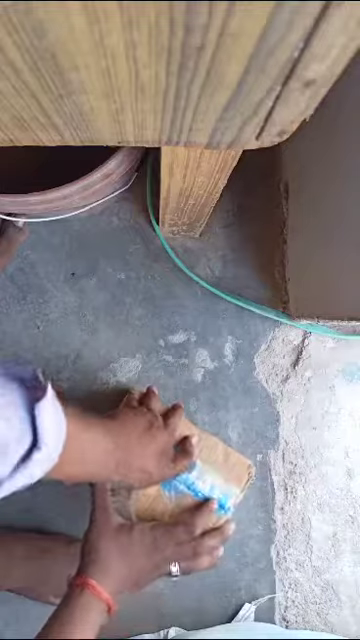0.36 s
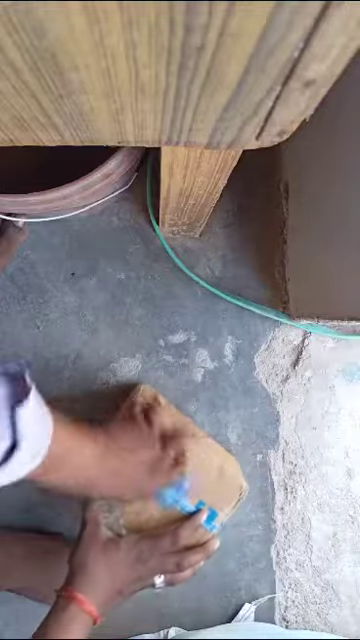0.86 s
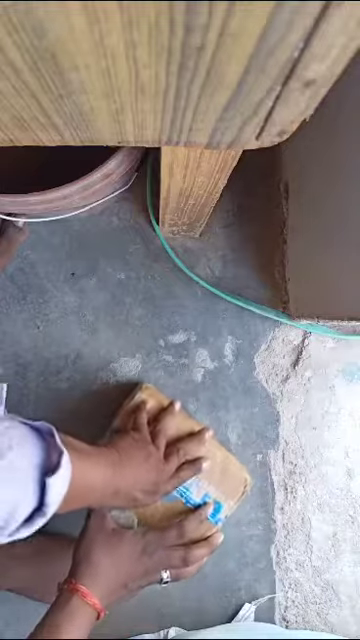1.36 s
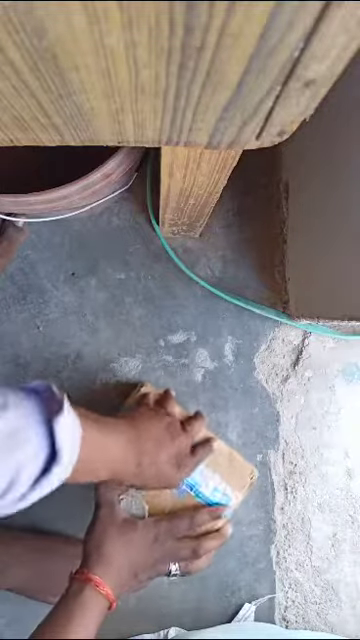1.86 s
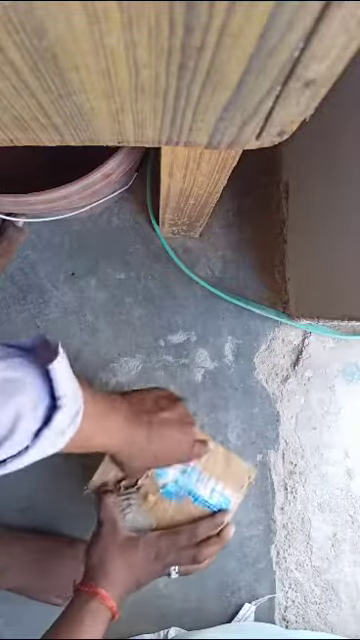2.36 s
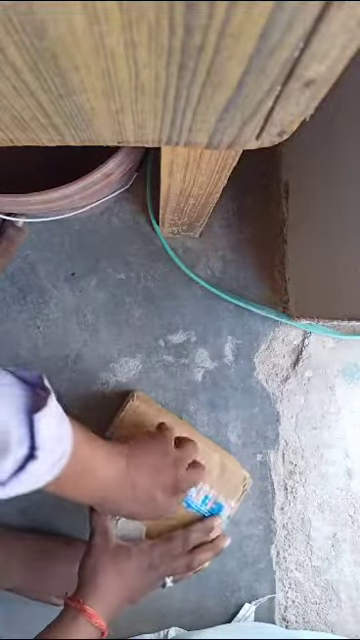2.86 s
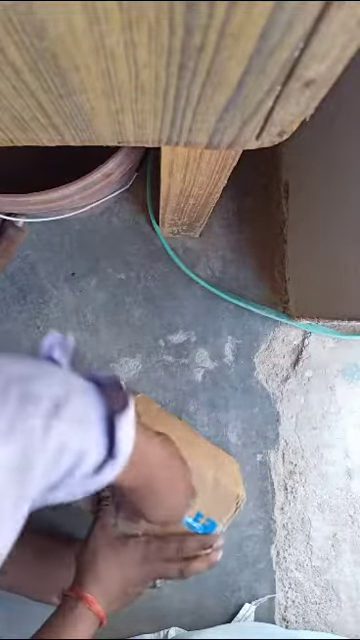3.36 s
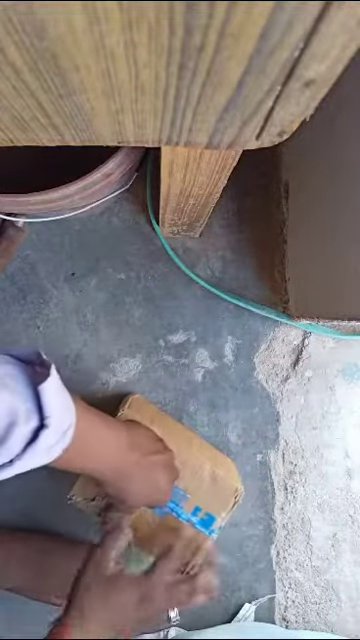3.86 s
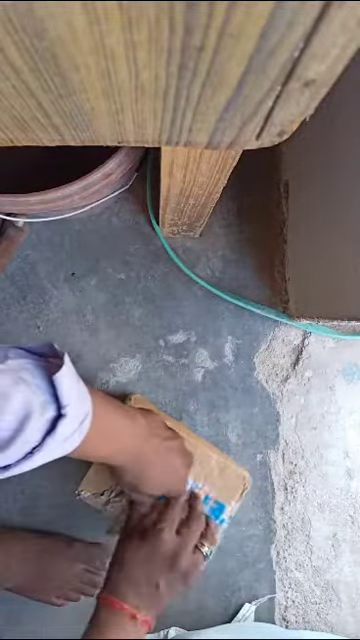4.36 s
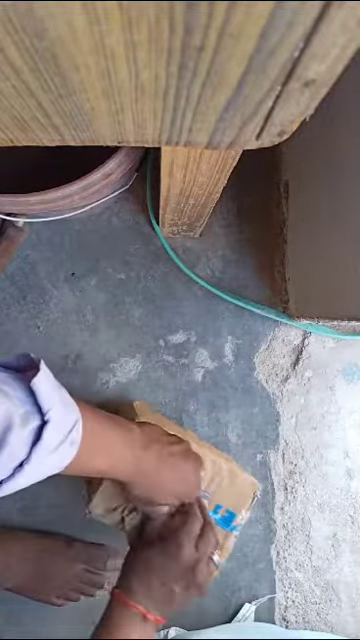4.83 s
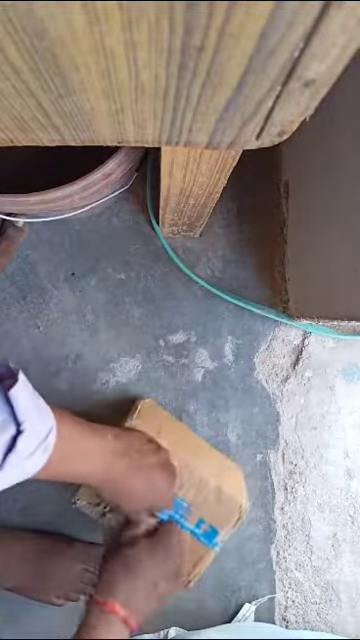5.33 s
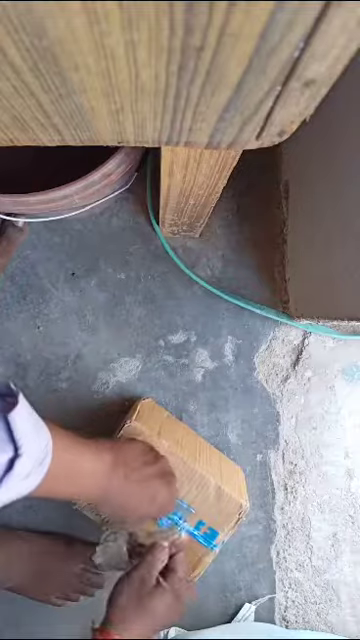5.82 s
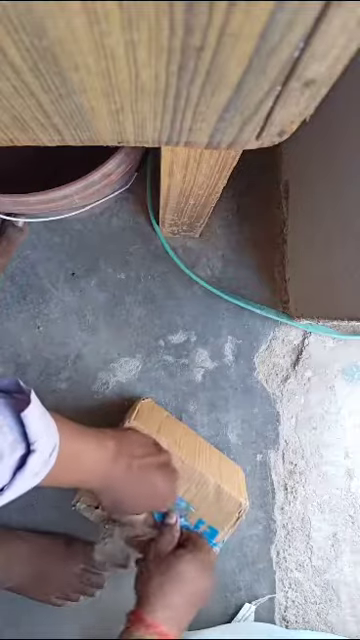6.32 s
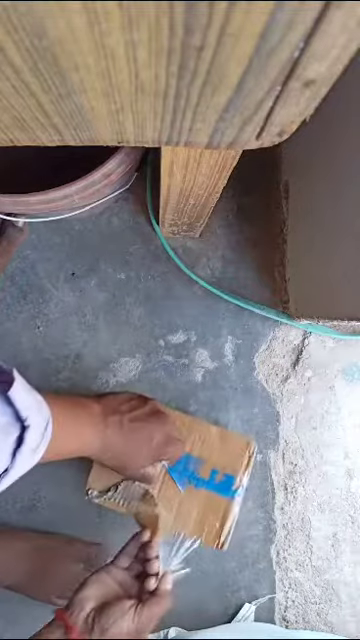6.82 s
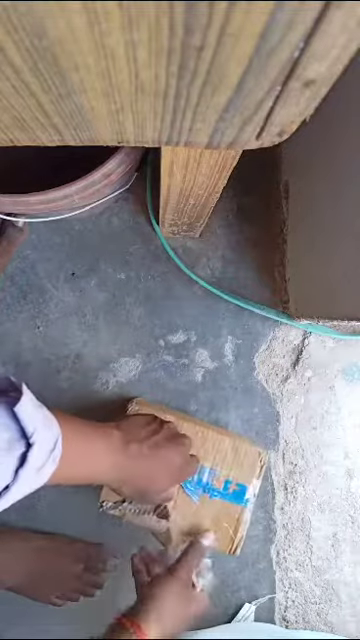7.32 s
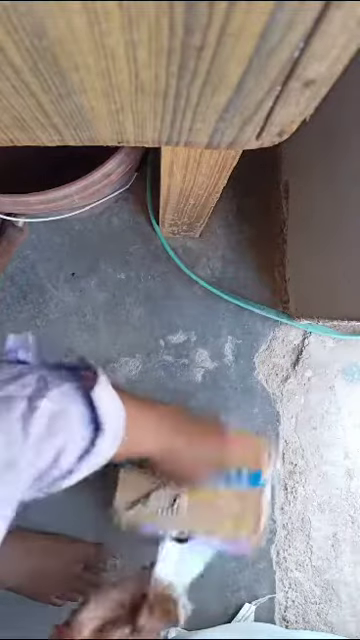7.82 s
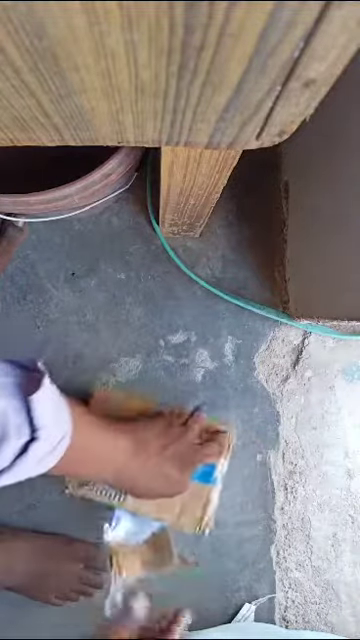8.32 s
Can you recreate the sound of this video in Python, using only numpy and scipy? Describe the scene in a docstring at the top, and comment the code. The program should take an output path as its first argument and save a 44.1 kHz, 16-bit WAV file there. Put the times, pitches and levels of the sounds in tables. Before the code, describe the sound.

Packing tape snaps and rips off a small hollow carton on concrete, in uneven bursts with quiet rustling between, over a growing distant engine throb.

```python
"""Hands tear open a taped cardboard parcel on a concrete floor beside walls.
Tape and fibres let go in snaps (noise bursts) and dense crackle (crowds of tiny fizzes);
the hollow box and its flaps boom and rasp along (ringing tones), and the walls echo.
An engine idles somewhere off and draws nearer (waves locked to its firing).
A faint hiss and rumble (filtered noise) lie under it all."""
import sys
import numpy as np
from scipy import signal
from scipy.fft import rfft, irfft
from scipy.io import wavfile

SR = 44100
rng = np.random.default_rng(int(sys.argv[2]) if len(sys.argv) > 2 else 0)


def transcribe(signal):
    """Save signal, clipped to [-1, 1], as a 16-bit WAV file at the path in sys.argv[1]."""
    frames = np.atleast_2d(signal).T
    limited = np.clip(frames, -1, 1)
    pcm = np.round(limited * 32767).astype(np.int16)
    wavfile.write(sys.argv[1], SR, pcm)


def amplitude_ratio(level_db):
    """Convert a level in decibels to the matching linear amplitude (field) ratio."""
    exponent = np.asarray(level_db, float) / 20
    return 10 ** exponent


N = 372204   # samples, about 8.44 s

# colour of the background noise: (frequency [Hz], relative level per Hz [dB])
AIR_COLOUR = [(26, -67), (45, 5.5), (170, 14), (338, 1), (432, -34), (624, 12), (741, -7), (1150, -7),
              (2410, -17), (8040, -12), (10500, -43), (14900, -34), (16700, -38)]
# loudness of the background noise: (time [s], level [dB])
AIR_LEVEL = [(0, -50), (1.2, -55), (2.4, -56.5), (3.4, -56.5), (4.0, -61), (4.6, -57.5), (6, -55.5),
             (7, -51.5), (8.44, -44)]
# pace of the engine: (time [s], firing rate [firings per s])
ENGINE_FIRING = [(0, 27.5), (3, 26.9), (3.8, 26.3), (4.5, 27), (5.9, 27.2), (6.9, 27.3), (7.7, 27.45),
                 (8.1, 27.25), (8.44, 26.8)]
# the engine nearing: (time [s], level of the seventh multiple [dB], swell of the two below it [dB])
ENGINE_NEARNESS = [(0, -63, -16), (2.5, -66, 5), (3.2, -58, -11), (3.9, -61, 3.5), (4.3, -67.5, 1),
                   (5.5, -54.5, 4), (6.3, -55.5, -17), (6.9, -50, -2), (7.3, -43, 6), (7.6, -47, -9),
                   (7.95, -39.5, -13), (8.1, -37.5, 0), (8.3, -40, 8), (8.44, -42.5, 11.5)]
# tones of the engine: (multiple of the firing rate, level against the seventh [dB], share of the swell)
ENGINE_ORDERS = [(2, -24, 0), (3, -19, 0), (4, -18, 0), (5, -6, .4), (6, -6, 1), (7, 0, 0), (8, -12, 0),
                 (11, -13, 0), (14, -17, 0)]
# the box slides on the concrete: (start [s], length [s], level at its height [dB])
FLOOR_SLIDES = [(1.97, 0.18, -47), (2.152, .14, -53.5), (2.524, 0.32, -63), (3.03, 0.085, -61),
                (7.47, 0.36, -49.5), (8.22, 0.24, -53)]
# single releases and bumps:
# (time [s], crack peak [dB], box knock [dB], wall and flap knock [dB], crack colour [Hz])
SNAPS = [(0.052, -44, -22.5, -31.5, 7360), (0.2727, -43, -33, -42.5, 8100), (0.4388, -29, -33, -29, 9200),
         (0.4503, -19, -53, -25.5, 9700), (0.4739, -21, -45, -23.5, 8780), (0.5165, -16.5, -32, -24, 8100),
         (0.5336, -23.5, -48, -26, 5400), (0.6128, -35, -34, -38, 9400), (0.6351, -34, -24, -36, 5070),
         (0.6868, -24, -48, -37, 9600), (0.7135, -37, -22.5, -43, 7400), (0.7456, -28.5, -42, -52, 8900),
         (0.876, -57, -27.5, -35.5, 4600), (0.902, -32, -35, -49, 7200), (0.9491, -30, -30, -45, 6890),
         (1.272, -52, -31, -40, 7800), (1.321, -45, -42, -61, 7500), (1.3716, -51, -31, -43, 7470),
         (1.393, -54, -32, -45, 7500), (1.4302, -29, -19.5, -27, 8660), (1.465, -36, -42, -49, 6870),
         (1.5162, -46, -35, -41, 7800), (1.5298, -31, -41, -41, 7200), (1.661, -26, -62, -44, 7840),
         (1.915, -7.5, -29, -17.5, 7350), (2.06, -61, -39, -36, 8560), (2.09, -33, -34, -33.5, 4210),
         (2.155, -56, -35, -33, 7910), (2.2644, -40, -48, -38, 7910), (2.6434, -43, -26, -33, 8230),
         (2.935, -45, -39.5, -53, 8190), (3.0228, -33, -60, -61, 6440), (3.0796, -32, -27.5, -32.5, 6740),
         (3.122, -35, -46, -61, 6650), (3.256, -36.5, -40, -45.5, 6760), (3.311, -42, -35.5, -51, 6850),
         (3.427, -37, -49, -43, 4800), (3.523, -40, -57, -51, 7900), (3.6132, -45, -62, -68, 6740),
         (3.7555, -43, -42, -57, 8680), (4.346, -44.5, -45, -46, 5870), (4.532, -32.5, -29, -31, 4950),
         (4.5581, -33, -33, -35, 8600), (4.581, -15, -19.5, -17.5, 4270), (4.7076, -25, -42, -36, 7300),
         (4.7438, -24.5, -33, -35, 7060), (4.7557, -25, -40, -37, 3860), (4.7727, -12.5, -55, -16.5, 7450),
         (4.7825, -40, -28, -29, 8500), (4.952, -42, -38, -43.5, 8230), (5.1103, -22, -33, -33, 8000),
         (5.29, -49, -33, -50, 7010), (5.3267, -29.5, -34, -38, 6450), (5.431, -20, -19.5, -43, 7070),
         (5.444, -1.5, -13.5, -12, 7800), (5.5597, -20.5, -50, -33, 8900), (5.632, -23.5, -30, -29.5, 9600),
         (5.666, -15.5, -20.5, -19.5, 9400), (5.692, -14, -3, -15, 4100), (5.9082, -37.5, -40, -55, 7100),
         (5.9947, -38.5, -41, -37.5, 8130), (6.1283, -32, -33.5, -36.5, 7160), (6.327, -40, -42, -48, 8900),
         (6.4485, -24, -38, -44, 7500), (6.4994, -19.5, -35, -40, 7260), (6.521, -18.5, -17.5, -25, 9300),
         (6.541, -5.5, -39, -13, 10000), (6.5475, -30, -6.5, -10.5, 7100), (6.571, -5.5, -9.5, -13, 7600),
         (6.5888, -5.5, -11, -22, 7150), (6.6182, -7, -37, -21, 5100), (6.666, -7, -13, -15, 9800),
         (6.6775, -11, -20, -17, 9300), (6.757, -20, -15, -24.5, 6000), (6.8202, -11, -17.5, -25.5, 9000),
         (6.8816, -26, -28.5, -29.5, 3750), (6.9451, -33, -35, -59, 9200), (7.0775, -58, -33.5, -60, 7540),
         (7.1369, -28, -29, -33, 4100), (7.2385, -18, -23, -24.5, 4640), (7.454, -29, -24.5, -26, 4100),
         (7.5343, -27.5, -54, -32, 4050), (7.7608, -27, -39, -56, 6800), (7.7781, -15, -15.5, -21.5, 5000),
         (7.826, -10, -26, -24, 4100), (7.837, -1.5, -25, -19, 4300), (7.8525, -3.5, -15.5, -8.5, 4400),
         (8.0444, -23, -6, -21, 7850), (8.181, -30.5, -42, -50, 3630), (8.2093, -33, -34, -44, 7870),
         (8.2228, -24.5, -27, -31, 8800), (8.2606, -46, -22, -43, 8300)]
# hands resting and shifting on the parcel, a faint crackle: (time [s], tape level [dB])
HAND_GRIP = [(0, -58.5), (1.1, -64.5), (1.9, -59.5), (2.3, -56), (2.4, -78), (2.5, -62), (3.85, -64),
             (4.0, -74), (4.15, -65.5), (4.5, -66), (5.0, -60.5), (6.1, -57), (6.249, -70.5), (6.45, -71),
             (7.0, -66), (7.4, -57), (8.44, -50.5)]
# pulls, pushes and slides of the hands:
# (time of full force [s], time held [s], tape crackle level [dB], box creak level [dB])
HAND_PULLS = [(0.0, 0.0093, -54, -42.5), (0.46, 0.096, -42, -40), (0.66, 0.076, -43.5, -43),
              (0.9, 0.061, -44, -41), (1.029, 0.01, -51.5, -41), (1.2, .02, -65.5, -52.5),
              (1.39, 0.028, -74, -54), (1.44, 0.01, -49, -43), (1.68, 0.023, -51, -42.5),
              (1.78, 0.039, -58, -52.5), (1.99, 0.097, -48.5, -39.5), (2.229, 0.01, -53, -40.5),
              (2.558, 0.2, -55, -44.5), (2.698, 0.01, -60, -41), (3.041, 0.056, -53, -47.5),
              (3.28, 0.025, -60, -56.5), (3.35, 0.046, -54, -55), (3.51, 0.018, -56.5, -61),
              (3.76, 0.12, -60.5, -58), (4.16, 0.1, -64, -69), (4.48, 0.01, -84, -46.5),
              (4.55, 0.014, -51.5, -50), (5.04, 0.024, -59, -50), (5.131, 0.039, -47, -40.5),
              (5.28, 0.062, -50, -47.5), (5.58, 0.15, -41.5, -62), (5.92, .02, -63, -55),
              (6.12, 0.026, -52, -57), (6.321, 0.039, -56, -57), (6.47, 0.019, -48.5, -48),
              (6.62, 0.12, -39, -31), (6.85, 0.063, -75, -47), (6.97, .07, -56, -48.5),
              (7.121, 0.055, -48.5, -43), (7.22, 0.026, -62, -66), (7.475, 0.018, -45.5, -40.5),
              (7.59, 0.13, -47.5, -42.5), (7.9, 0.029, -25.5, -32), (8.06, 0.01, -42, -32),
              (8.21, 0.025, -42, -39), (8.31, 0.042, -44.5, -36.5)]
# fast rips: (start [s], time until the fade [s], rise time [s], tape level [dB], box level [dB])
FAST_RIPS = [(0.405, 0.092, 0.016, -56, -50), (0.64, 0.15, 0.028, -68, -44.5),
             (0.87, 0.062, 0.077, -41, -73), (5.427, 0.023, 0.0034, -34, -37),
             (5.683, 0.036, 0.007, -22.5, -30.5), (6.547, 0.081, 0.0027, -22.5, -29),
             (6.656, 0.019, 0.014, -22.5, -40), (7.818, 0.088, 0.047, -16, -22.5)]
# where the box is worked; squeezed it answers low, torn near a wall it answers high:
# (time [s], favoured frequency [Hz])
WORKED_SPOT = [(0, 322), (0.4, 340), (0.5, 577), (0.72, 604), (0.8, 318), (2.9, 306), (3.1, 513),
               (3.3, 342), (4.6, 354), (4.72, 626), (5.1, 550), (5.25, 332), (5.66, 450), (6.4, 328),
               (6.55, 560), (6.78, 610), (6.95, 330), (7.75, 272), (7.86, 450), (8.05, 470), (8.44, 260)]
# tones of the air and panels of the box, and of its thin walls and flaps:
# (frequency [Hz], relative level [dB], time to fade by 60 dB when rubbed [s])
BOX_TONES = [(161, -16.5, 0.059), (202, -11, 0.056), (255, -8, 0.063), (307.8, -2, 0.085),
             (366.5, -3.5, 0.066), (470, -13, 0.018), (516, -4.5, 0.049), (605.7, -1.5, 0.05),
             (646.2, -9.5, 0.095)]
FLAP_TONES = [(844, -6, 0.04), (962.5, -1, 0.022), (1169, -3.5, 0.029), (1170, -2.5, 0.021),
              (1407, -3.5, 0.023), (1550, -13, 0.051), (1857, -5.5, 0.019), (1960, -34, 0.0079),
              (2730, -20, 0.026)]
# tones of the loose strip of tape: (frequency [Hz], relative level [dB], time to fade by 60 dB [s])
STRIP_TONES = [(3470, 3, 0.0084), (4100, 12.5, 0.005), (5050, 6.5, 0.0059), (5990, 8.5, 0.0036),
               (7300, -10.5, 0.0096), (7800, -17, 0.0078), (8900, -25, .005)]
# colour of the tape letting go, and of the fast rips: (frequency [Hz], relative level per Hz [dB])
TAPE_COLOUR = [(1180, -25), (2000, -8.5), (2670, -10), (2910, -11.5), (3980, -4), (5490, -3), (7000, 1.5),
               (9090, 0), (11000, -11), (14900, -8.5), (16700, -14.5)]
RIP_COLOUR = [(1180, -54), (2000, 2), (2490, -20), (3170, 0.5), (4120, 5), (5250, -7.5), (6820, 5.5),
              (7380, -1), (8700, 6.5), (12000, -10.5), (14900, -7), (16700, -49)]


def rms_one(x):
    """Scale to an average strength (rms) of 1."""
    return x / np.sqrt(np.mean(x ** 2) + 1e-20)


def in_time(rows):
    """Columns of a table as curves, one value a sample."""
    s, *columns = np.transpose(rows)
    return [np.interp(np.arange(N) / SR, s, c) for c in columns]


def filtered(x, order, hz, kind):
    """Keep only the low, high or middle part of a sound."""
    return signal.sosfilt(signal.butter(order, hz, kind, fs=SR, output="sos"), x)


def coloured(x, spectrum):
    """Give x the colour of a table, by a filter that never sounds ahead of its input (minimum phase)."""
    hz, db = np.transpose(spectrum)
    grid = np.maximum(np.arange(2049) * SR / 4096, 10)
    log_level = np.interp(np.log(grid), np.log(hz), db) * np.log(10) / 20
    # folding the cepstrum forward in time gives the minimum phase
    cepstrum = irfft(log_level)
    cepstrum[1:2048] *= 2
    cepstrum[2049:] = 0
    response = irfft(np.exp(rfft(cepstrum)))
    return signal.fftconvolve(x, response)[:len(x)]


def drift(rate_hz):
    """Slow random wandering with a spread of 1."""
    # worked out every 40 samples; the first 2000 values let the filter settle
    r = np.exp(-80 * np.pi * rate_hz / SR)
    noise = rng.standard_normal(N // 40 + 2002)
    slow = rms_one(signal.lfilter([1], [1, -2 * r, r * r], noise)[2000:])
    return np.interp(np.arange(N) / 40, np.arange(len(slow)), slow)


def ring(x, hz, t60):
    """A unit click sets a sine of height 1 ringing, which fades by 60 dB in t60 seconds."""
    r, w = amplitude_ratio(-60 / (t60 * SR)), 2 * np.pi * hz / SR
    return signal.lfilter([0, np.sin(w)], [1, -2 * r * np.cos(w), r * r], x + 1e-18)


def grains(per_s, spread_db, clump_hz):
    """Random clicks of uneven size, whose sizes swell and shrink together (2 dB spread)."""
    luck_db = spread_db * np.minimum(rng.exponential(1, N), 3)
    sizes = amplitude_ratio(luck_db + 2.0 * drift(clump_hz))
    return sizes * rng.choice([-1, 1], N) * (rng.random(N) < per_s / SR)


def fading_power(clicks, t60):
    """Each click leaves power that dies away; noise shaped by its root fades by 60 dB in t60 seconds."""
    return signal.lfilter([1], [1, -amplitude_ratio(-120 / (t60 * SR))], clicks)


def air():
    """Far rumble and hiss, gently uneven, and a high band of hiss that wavers a little."""
    hiss = filtered(rng.standard_normal(N), 2, [7875, 8625], "band")
    far = rms_one(coloured(rng.standard_normal(N), AIR_COLOUR))
    far_level = amplitude_ratio(in_time(AIR_LEVEL)[0] + 0.53 * drift(3.2))
    return far_level * far + amplitude_ratio(-67 + 1.5 * drift(1.8)) * rms_one(hiss)


def engine():
    """Low multiples of a firing rate, locked together so that they throb; each wavers a little."""
    turn = 2 * np.pi * np.cumsum(in_time(ENGINE_FIRING)[0]) / SR
    level_db, swell_db = in_time(ENGINE_NEARNESS)
    out = np.zeros(N)
    for k, order_db, share in ENGINE_ORDERS:
        loudness_db = level_db + order_db + share * swell_db + 1.5 * drift(4.2)
        out += amplitude_ratio(loudness_db) * np.cos(k * turn - 0.302 * k * k)
    return np.sqrt(2) * out


def room(x):
    """Walls answer with a dense tail of echoes that dies away, the treble first."""
    t60, level_db = 0.28, -10   # fade time of the dull part [s], level of the tail [dB]
    age = np.arange(round(.5 * SR)) / SR
    noise = rng.standard_normal((2, len(age))) * (age > .004)
    dull = filtered(noise[0], 2, 4100, "low") * amplitude_ratio(-60 * age / t60)
    bright = noise[1] * amplitude_ratio(-60 * age / (0.51 * t60))
    tail = dull + bright
    return amplitude_ratio(level_db) * signal.fftconvolve(x, tail / np.sqrt(np.sum(tail ** 2)))[:N]


def slides():
    """The box on the concrete: a smooth scrape of noise that swells and sinks within each slide."""
    t, gain = np.arange(N) / SR, np.zeros(N)
    for s, length, db in FLOOR_SLIDES:
        gain += amplitude_ratio(db) * np.sin(np.pi * np.clip((t - s) / length, 0, 1))
    scrape = filtered(rng.standard_normal(N), 2, (805, 2170), "band")
    return gain * amplitude_ratio(2.2 * drift(25)) * rms_one(scrape)


def handling():
    """Tape, box and flap gain of the hands: the grip, pulls that swell, hold and ease, and what snaps leave."""
    swell_db_per_s, ease_db_per_s, after_fade_db_per_s = 224, 246, 251
    t = np.arange(0, N, 40) / SR
    s, grip_db = np.transpose(HAND_GRIP)
    # creak and rasp of the grip stand 5.5 and -0.5 dB against its crackle
    power = amplitude_ratio(np.interp(t, s, grip_db) + np.array([[0], [5.5], [-0.5]])) ** 2
    for s, held, tape_db, box_db in HAND_PULLS:
        force_db = -swell_db_per_s * np.maximum(s - t, 0) - ease_db_per_s * np.maximum(t - s - held, 0)
        # the rasp of the fibres is set between crackle and creak, then 4 dB lower
        rasp_db = tape_db + 0.69 * (box_db - tape_db) - 4
        power = power + amplitude_ratio(force_db + np.array([[tape_db], [box_db], [rasp_db]])) ** 2
    for s, *levels_db, hz in SNAPS:
        # a snap leaves tape crackling, box creaking and flaps rasping, this far [dB] against it
        left_db = np.add(levels_db, (-22.5, -30, -30.5))[:, None] - after_fade_db_per_s * np.maximum(t - s, 0)
        power = power + (t > s) * amplitude_ratio(left_db) ** 2
    return [np.interp(np.arange(N) / SR, t, np.sqrt(p)) for p in power]


def rips():
    """Tape, box and flap gain of the fast rips: each rises steadily, and after its length fades quickly."""
    t, gains = np.arange(N) / SR, np.zeros((3, N))
    for s, length, rise, tape_db, box_db in FAST_RIPS:
        fade = amplitude_ratio(-60 * np.maximum(t - s - length, 0) / 0.081)
        shape = np.clip((t - s) / rise, 0, 1) * fade
        flap_db = (tape_db + box_db) / 2 - 2
        gains += amplitude_ratio(np.array([tape_db, box_db, flap_db]))[:, None] * shape
    return gains


def struck(tones, levels_db, favoured_hz, narrow_db, rubbing, scatter_db):
    """Snaps set all tones ringing, rubbing grains one each; narrow_db is lost per octave off favoured_hz."""
    at = np.round(np.transpose(SNAPS)[0] * SR).astype(int)
    luck_db = scatter_db * rng.standard_normal((len(at), len(tones)))
    # chance shares out the blow among the tones, its energy stays
    weight = amplitude_ratio(np.transpose(tones)[1]) ** 2
    luck_db = luck_db - 10 * np.log10(amplitude_ratio(luck_db) ** 2 @ weight / weight.sum())[:, None]
    dealt = rng.integers(0, len(tones), N)
    blows, rubbed = np.zeros(N), np.zeros(N)
    for k, (hz, level_db, t60) in enumerate(tones):
        off_db = -narrow_db * np.abs(np.log2(hz / favoured_hz))
        clicks = np.zeros(N)
        np.add.at(clicks, at, amplitude_ratio(levels_db + off_db[at] + luck_db[:, k]) * (-1) ** k)
        # the gripping hand damps a knock
        blows += amplitude_ratio(level_db) * ring(clicks, hz, 0.79 * t60)
        # rubbing is less choosy about tones than a knock
        rubs = rubbing * (dealt == k) * amplitude_ratio(0.75 * off_db)
        rubbed += amplitude_ratio(level_db) * ring(rubs, hz, t60)
    return blows, rms_one(rubbed)


def ticks():
    """Now and then a single spot of glue lets go: a thin fizz of a few milliseconds."""
    dying = fading_power(grains(45, 5.5, 5.4) ** 2 + 1e-18, t60=0.016)
    return amplitude_ratio(-7.5) * rms_one(coloured(rng.standard_normal(N) * np.sqrt(dying), TAPE_COLOUR))


def tape_crackle(spectrum, per_s, spread_db, fizz_t60, hiss_db, strip_db):
    """Hundreds of tiny releases a second, each a short fizz that favours one tone of the strip, over hiss."""
    releases = grains(per_s, spread_db, 45) ** 2
    dealt = rng.integers(0, len(STRIP_TONES), N)
    noise, skin_hiss = rng.standard_normal((2, N))
    fizz = noise * np.sqrt(fading_power(releases, fizz_t60))
    strip = np.zeros(N)
    for k, (hz, db, t60) in enumerate(STRIP_TONES):
        share = noise * np.sqrt(fading_power(releases * (dealt == k) + 1e-18, fizz_t60))
        strip += amplitude_ratio(db) * rms_one(ring(share, hz, t60))
    broad = coloured(rms_one(fizz) + amplitude_ratio(hiss_db) * skin_hiss, spectrum)
    return rms_one(rms_one(broad) + amplitude_ratio(strip_db) * rms_one(strip))


def cracks(t60, colour_db):
    """Glue letting go: a sudden burst of noise dying in milliseconds, with a broad band of its own added."""
    out, age = np.zeros(N + 2048), np.arange(2048) / SR
    for s, peak_db, knock_db, flap_db, hz in SNAPS:
        noise = rng.standard_normal(2048)
        burst = coloured(noise * amplitude_ratio(-60 * age / t60), TAPE_COLOUR)
        burst = rms_one(burst) + amplitude_ratio(colour_db) * rms_one(ring(burst, hz, .002))
        at = round(s * SR)
        out[at:at + 2048] += amplitude_ratio(peak_db) * burst / np.abs(burst).max()
    return out[:N]


def parcel():
    """Crackle, cracks and scrapes, and the box and its flaps sounding with the handling."""
    tape, box, flap = handling()
    rip_tape, rip_box, rip_flap = rips()
    worked_hz, = in_time(WORKED_SPOT)
    s, peak_db, knock_db, flap_db, hz = np.transpose(SNAPS)
    knocks, creak = struck(BOX_TONES, knock_db, worked_hz, 5.0, grains(1500, 4.5, 42), scatter_db=7.0)
    flaps, rasp = struck(FLAP_TONES, flap_db, worked_hz, 0.0, grains(2500, 5.0, 66), scatter_db=4.0)
    steady = tape_crackle(TAPE_COLOUR, per_s=700, spread_db=4.8, fizz_t60=0.045, hiss_db=-0.43, strip_db=-7.5)
    ripping = tape_crackle(RIP_COLOUR, per_s=980, spread_db=1.8, fizz_t60=0.0056, hiss_db=2.0, strip_db=-3.5)
    crackle = tape * (steady + ticks()) + rip_tape * ripping
    body = (box + rip_box) * creak + (flap + rip_flap) * rasp + knocks + flaps
    # a small box gives off little sound below its lowest tone
    body = filtered(body, 3, 150, "high")
    return crackle + body + slides() + cracks(t60=0.032, colour_db=-4.0)


def scene():
    """The parcel close by, its echo, and the background."""
    near = parcel()
    return (near + room(near) + engine() + air())[None]


def roll_off(x):
    """The treble ends steeply here."""
    return signal.sosfilt(signal.butter(12, 15620, fs=SR, output="sos"), x)


def record(dry):
    """A small microphone without deep bass, whose peaks are rounded off towards full scale."""
    thin = filtered(dry, 4, 50, "high")
    mix = np.tanh(thin)
    return roll_off(mix)


dry = scene()
out = record(dry)
transcribe(out)
```